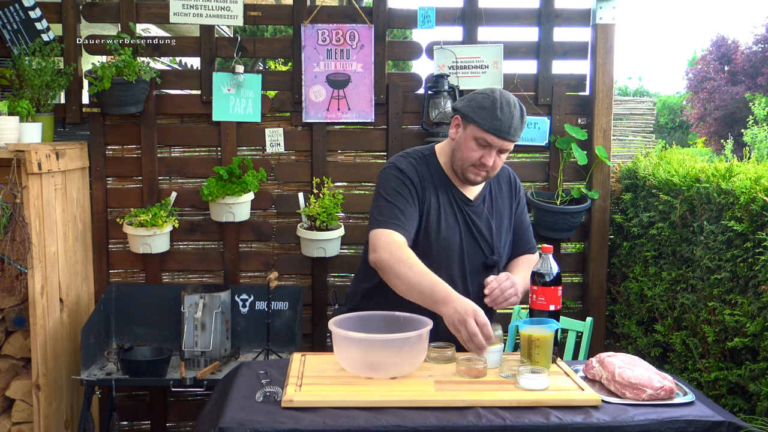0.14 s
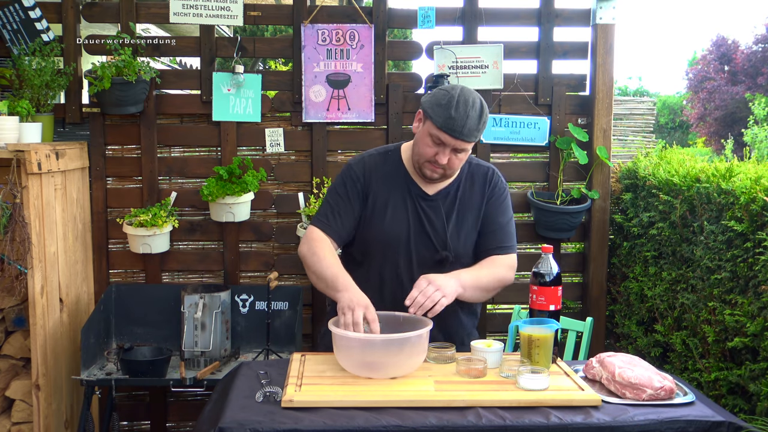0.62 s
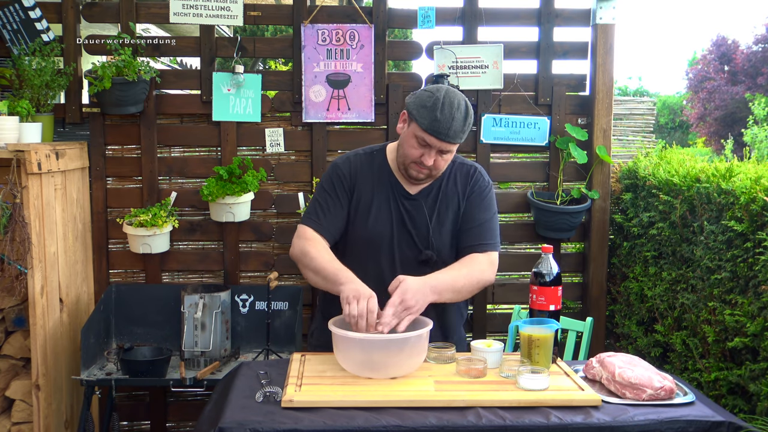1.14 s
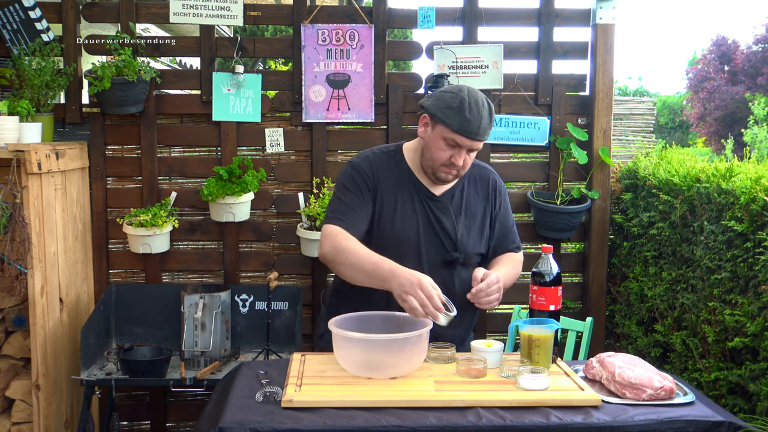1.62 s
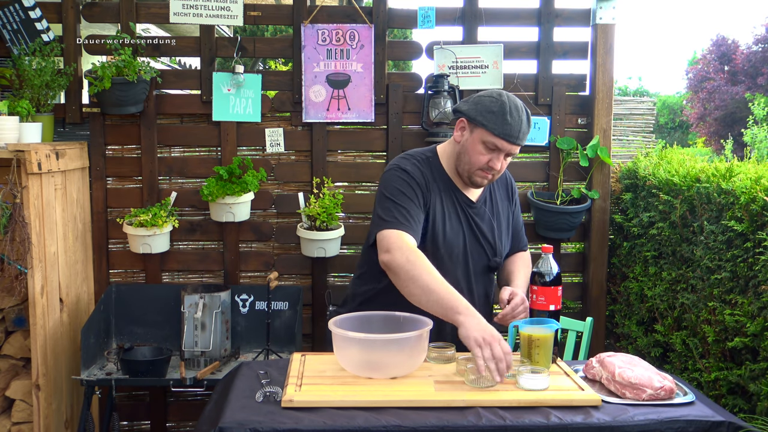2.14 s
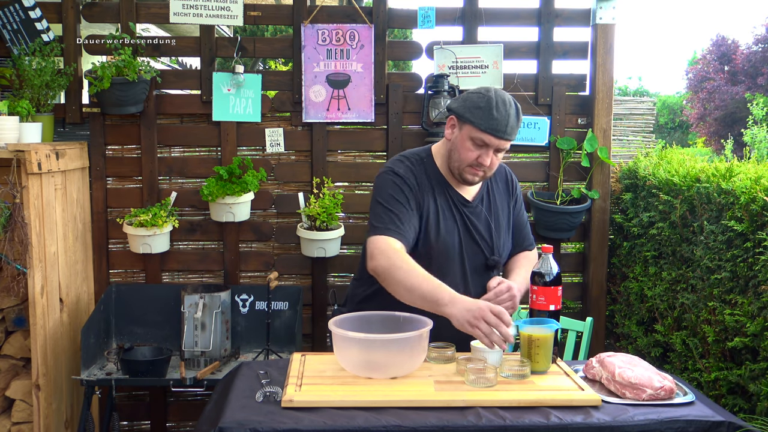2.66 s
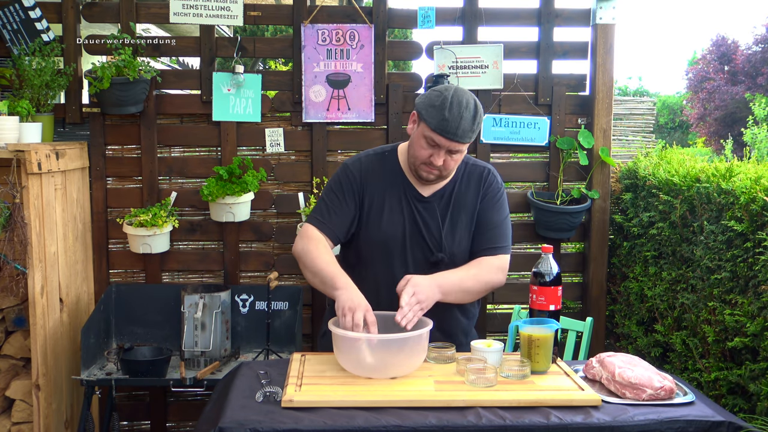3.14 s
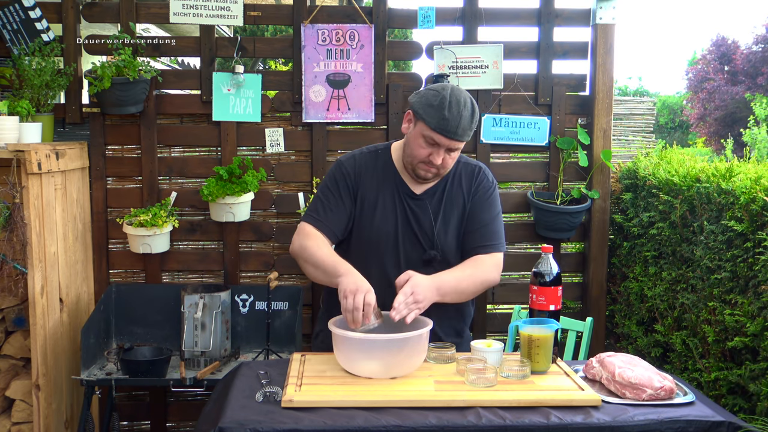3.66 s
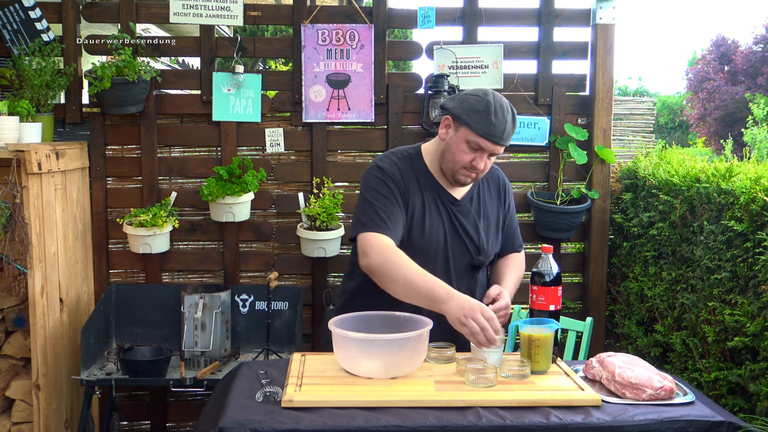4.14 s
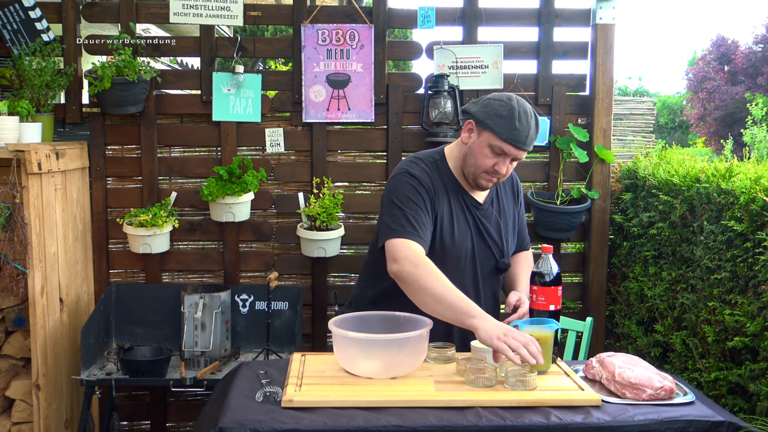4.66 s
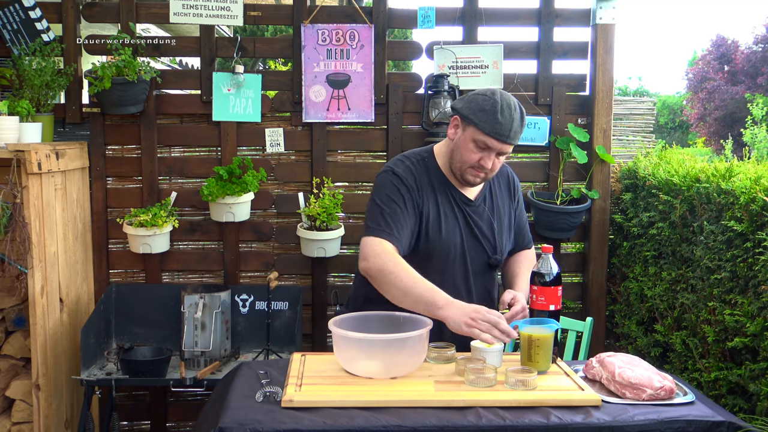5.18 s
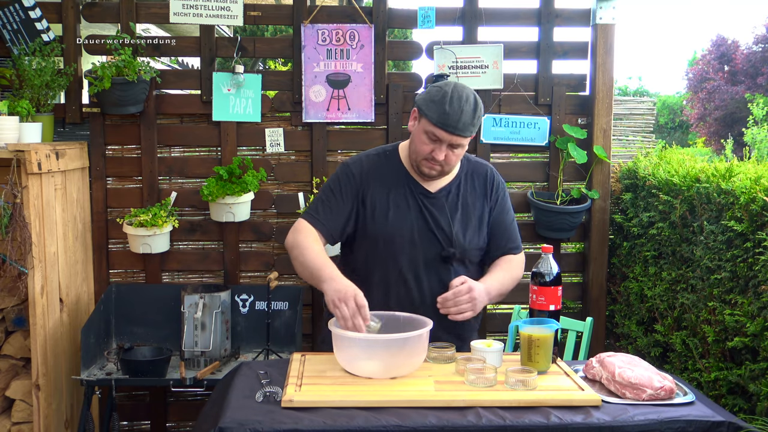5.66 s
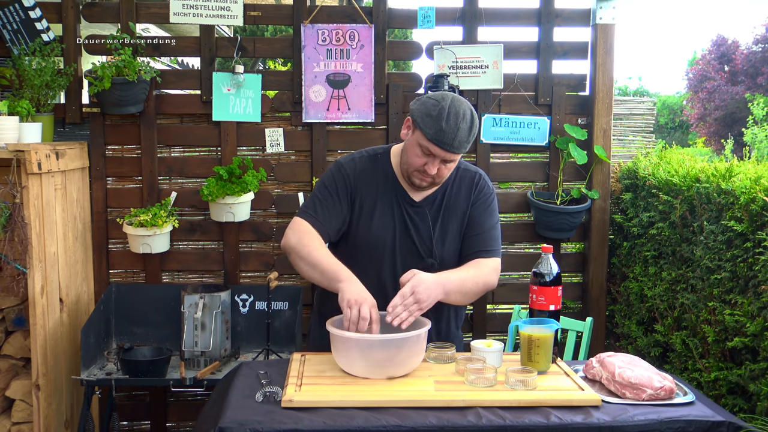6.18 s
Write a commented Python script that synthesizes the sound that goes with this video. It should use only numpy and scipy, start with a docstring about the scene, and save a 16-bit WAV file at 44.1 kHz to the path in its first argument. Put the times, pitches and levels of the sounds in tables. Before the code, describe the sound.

In a garden, low distant traffic and thin bird chirps run throughout. Close by, fingers slap a small glass dish over a plastic bowl, with short muted glassy pings. It is put down on a wooden board in a quick rattle of knocks. A second dish is tapped out, then set down much harder with a loud ringing clink that slightly overloads the microphone. Two dull bowl bumps end the stretch.

```python
"""Traffic rumble and birds throughout; over them, small glass dishes are tapped over a plastic bowl
and set on a wooden board in turn at a garden table. Traffic is shaped noise, birds are gliding
whistles; glass, bowl and board are sums of dying modes. Fingers damp the glass, slaps are noise
bursts, sliding powder is dense grains. The loudest blow overloads the microphone."""
import sys
import numpy as np
from scipy import signal
from scipy.fft import rfft, irfft
from scipy.io import wavfile
from scipy.ndimage import uniform_filter1d

SR = 44100
rng = np.random.default_rng(int(sys.argv[2]) if len(sys.argv) > 2 else 0)


def unload_wav(signal):
    """Save mono or channel-first audio to the path in sys.argv[1] as 16-bit WAV at rate SR, clipped to [-1, 1]."""
    wavfile.write(
        sys.argv[1],
        SR,
        np.round(np.clip(np.atleast_2d(signal).T, -1, 1) * 32767).astype(np.int16),
    )


def amplitude_ratio(level_db):
    """Convert a level in decibels to the matching linear amplitude (field) ratio."""
    exponent = np.asarray(level_db, float) / 20
    return 10 ** exponent


N = 277389

# traffic spectrum: (frequency [Hz], density [dB per Hz])
TRAFFIC_SPECTRUM = [(12, -41.5), (20, -9.5), (38, 5), (65, 0.5), (146, -9), (277, -3.5), (499, -8.5),
                    (660, -4.5), (1150, -12.5), (1760, -17), (2260, -19), (4810, -30), (6720, -35.5),
                    (14700, -38), (16000, -46)]
# traffic swell: (time [s], roar level [dB], rumble level before its random waver [dB])
TRAFFIC_LEVELS = [(0, -51, -48), (1.9, -49.5, -52.5), (4.0, -51, -47.5), (4.8, -49.5, -48),
                  (5.2, -50, -56.5), (6.29, -50.5, -53)]
DRONE_HZ, DRONE_WIDTH_HZ, DRONE_DB = 52.5, 9.1, -7.5   # a far engine, dB over the rumble
RUMBLE_SWELL_DB, RUMBLE_SWELL_S = 2.5, .3   # random waver: std of its points, their spacing

# one bird's repeated chirp: (time [s], level [dB])
CHIRP_TIMES = [(.03, -60), (.428, -57), (.775, -57.5), (1.114, -57), (1.441, -55), (1.55, -62),
               (2.19, -65.5), (2.3, -71), (2.57, -61.5), (2.9, -59.5), (4.0, -60), (4.14, -57.5)]
# parts of the chirp: (delay [s], length [s], start [Hz], end [Hz], level over the chirp [dB])
CHIRP_PARTS = [(0, .025, 3180, 4450, 0), (0.023, 0.049, 4600, 4720, 0.5), (.07, 0.027, 3800, 3250, 0)]
# single notes of other birds: (time [s], mid pitch [Hz], level [dB])
BIRD_NOTES = [(.045, 2930, -54.5), (.536, 4640, -56), (.619, 4780, -56), (.98, 4530, -57),
              (1.258, 5100, -58), (1.799, 5000, -55.5), (1.908, 4650, -57), (2.429, 2870, -53.5),
              (2.452, 5080, -59.5), (3.02, 4980, -58), (3.338, 2960, -55), (3.642, 5050, -54),
              (3.75, 4720, -59), (4.19, 5410, -56.5), (4.667, 5480, -67), (4.936, 4880, -61),
              (5.171, 4860, -56), (5.28, 4730, -56.5), (5.444, 3830, -57.5), (5.485, 2970, -54.5),
              (5.696, 4800, -54), (5.717, 5530, -54)]
# bouts of farther birds: (start [s], end [s], level [dB])
CHORUS_BOUTS = [(.0, .15, -70), (.55, 1.487, -64), (1.763, 1.95, -63.5), (2.399, 2.74, -69.5),
                (3.045, 3.22, -60), (3.6, 4.291, -67.5), (4.596, 4.997, -64.5), (5.15, 5.554, -69.5),
                (5.699, 5.874, -62.5), (6.152, 6.29, -60.5)]
# range of chorus start pitches: (lowest [Hz], highest [Hz])
CHORUS_RANGE_HZ = (3035, 5424)
NOTE_S, NOTE_RISE_SHARE = .038, .08   # notes slide up a little
BOUT_FADE_DB_PER_S, CHORUS_QUIET_DB = 127.5, -88.5
WARBLE_HZ = 85   # rms pitch wander
GARDEN_DB, GARDEN_CHORUS_DB, GARDEN_T60_S, GARDEN_CUT_HZ = -4, 4, .25, 9000   # echo energy over direct

# glass contacts: (time [s], low ring [dB], first dish's high ring [dB], second dish's high ring [dB],
#                  freedom from the fingers [0-1])
GLASS_CLINKS = [(.6085, -59, -47, -47, 0.06), (0.6662, -80, -37, -53, 0.36), (1.1159, -62, -42, -49, 0.3),
                (1.259, -59.5, -41, -47.5, 0), (2.0522, -32, -33.5, -56, 0.19),
                (2.098, -29, -47, -50.5, 0.08), (2.127, -33, -52, -53, 0.3), (3.5677, -44, -42, -20, .1),
                (3.6476, -76, -65, -51, 0.3), (4.3105, -5, -0.5, -16, 0.17), (4.3291, -21, -3, -20, 0.46),
                (4.345, -13.5, -35.5, -14, 1), (4.796, -46, -43, -59, 0.32)]
# finger on the held dish over the bowl: (time [s], slap [dB], bowl [dB], low ring [dB], high ring [dB])
FINGER_TAPS = [(0.885, -50, -60, -62, -40), (0.9062, -27, -24.5, -38, -26), (0.914, -28, -41, -64, -54),
               (0.967, -36, -53, -57, -43), (1.055, -10, -25, -49, -42), (1.1983, -11, -35, -32, -10),
               (3.267, -38, -52, -70, -60), (3.2817, -29, -26.5, -44, -28), (3.4345, -9, -28.5, -22.5, -13),
               (3.5687, -9.5, -38, -47, -20), (5.9956, -33, -58, -68, -60), (6.0204, -30, -52, -67, -62),
               (6.235, -34, -66.5, -70, -60)]
# the hand lets go of a dish that still rocks: (time [s], low ring [dB])
RELEASES = [(2.147, -49), (4.35, -13.5)]
# low glass ring: (frequency [Hz], t60 when free [s])
LOW_RING_MODE = (2702, .38)
# high modes of each dish: (frequency [Hz], level [dB], t60 when free [s])
FIRST_DISH_MODES = [(3050, -26, .05), (4549, -30, .06), (6358, -14, .26), (11230, -27, .13),
                    (11820, -26, .15)]
SECOND_DISH_MODES = [(6993, -10, .17), (7095, -8, .18), (12170, -32, .12), (14910, -30, .078)]
# spectrum of glass grinding on glass: (frequency [Hz], density [dB per Hz])
GRIND_SPECTRUM = [(2000, -34), (3500, -4), (4800, 5), (8000, -16.5), (12000, -17), (16000, -28)]
HELD_FREEDOM, HELD_SECOND_DB = 0.14, -13   # the gripped dish rings briefly
SWELL_S, ROCKING_S = .004, 0.055   # the freed ring builds up, is fed while the dish rocks, then dies
GRIND_DB, GRIND_T60_S = -32.5, 0.24   # dB over the first dish's ring
MIN_FREEDOM = .03
SPOT_DB = 2.42   # spread of mode strengths from blow to blow

# powder and fingers sliding: (peak time [s], peak level [dB], rise [dB per s], fall [dB per s])
SLIDE_SWELLS = [(.68, -68, 90, 110), (1.2, -62.5, 27, 35), (1.9, -59, 85, 133), (3.199, -59.5, 60, 25),
                (3.27, -47.5, 320, 260), (5.85, -55.5, 150, 250), (6.054, -44.5, 313, 53)]
# sliding spectrum: (frequency [Hz], density [dB per Hz])
SLIDE_SPECTRUM = [(590, -43.5), (1000, -3), (1260, -19), (1480, 5), (3710, -5.5), (7440, -4), (10400, -8.5),
                  (13000, -11.5), (16000, -17)]
GRAINS_PER_S, GRAIN_SPREAD_DB, CLUMP_DB = 7000, 0.5, 2.6   # clumps last a few ms

# slap spectrum, skin on glass: (frequency [Hz], density [dB per Hz])
SLAP_SPECTRUM = [(180, -16.5), (300, 10), (667, -9.5), (1510, 2.5), (2320, -1), (2610, -1), (4520, -13.5),
                 (6100, 4.5), (8220, -9), (16000, -17)]
# jolt of hand and table: (frequency [Hz], level over the slap [dB], t60 before freedom [s])
JOLT_MODES = [(63.7, -24, 0.13), (118, -16.5, 0.047), (343, -16, 0.008)]
# plastic bowl modes: (frequency [Hz], level [dB], t60 before freedom [s])
BOWL_MODES = [(87, -17.5, 0.085), (143, -10, 0.051), (192, -4.5, 0.044), (274, -19.5, 0.13),
              (419, 4.5, 0.016), (462, -5.5, 0.026), (528, -25, 0.13), (1010, -9.5, 0.05), (1480, 2, 0.025),
              (2050, 8, 0.014)]
# dish bumps the bowl wall: (time [s], level [dB], roll-off [Hz])
BOWL_BUMPS = [(5.8643, -9, 900), (5.879, -7, 453)]
SLAP_T60_S = .008   # all slaps are equally short
BOWL_ROLL_HZ, BOWL_ROLL_HZ_PER_DB, BOWL_ROLL_MIN_HZ = 900, 17, 400   # first is for a -10 dB slap
BUMP_SLAP_DB, BUMP_SLAP_T60_S = -31, 0.0084   # dB over the bump

# dish foot on the board: (time [s], level [dB], hardness as roll-off [Hz], hollow level [dB])
BOARD_KNOCKS = [(2.0568, -5, 1300, -24), (2.094, -19, 1170, -43), (2.0987, -5.5, 1400, -35),
                (2.127, -7.5, 1600, -17.5), (2.1468, -3.5, 1400, -43), (2.159, -12.5, 1500, -44),
                (2.168, -21, 1400, -52), (2.175, -32, 1500, -55), (4.3107, -2, 3300, -18.5),
                (4.3296, -9, 2500, -32.5), (4.339, -8.5, 1800, -37.5), (4.352, -15, 2400, -41),
                (4.36, -7, 2100, -51.5), (4.371, -15, 1800, -49), (4.531, -3, 1400, -46),
                (4.541, -4, 1900, -38), (4.554, -18.5, 1200, -25.5), (4.984, -11, 1160, -33)]
# wooden board modes: (frequency [Hz], level [dB], t60 before BOARD_FREEDOM [s])
BOARD_MODES = [(138, -20, 0.36), (239, -24.5, 0.36), (499, -14, 0.14), (611, -28, 0.23), (757, -13.5, 0.13),
               (780, -12.5, 0.09), (824.4, -7, 0.075), (930.3, -4, 0.076), (900, -12, 0.034),
               (1197, -19.5, 0.014), (1258, -2.5, 0.039), (1400, -15, 0.13), (1488, -11, 0.07),
               (1760, -25.5, 0.07), (1687, -11.5, 0.058), (1982, 0, 0.029), (2140, -23.5, 0.094)]
# contact click spectrum: (frequency [Hz], density [dB per Hz])
CLICK_SPECTRUM = [(300, -45), (1200, 8), (3000, 16.5), (6000, -8.5), (16000, -25.0)]
BOARD_FREEDOM = 0.7   # the dish resting on the wood shortens its ring
HOLLOW_HZ, HOLLOW_T60_S, HOLLOW_RISE_S = 312, .33, .035   # air space under the board, slow to start
USUAL_HARDNESS_HZ = 1400
CLICK_DB, CLICK_DB_PER_OCTAVE, CLICK_T60_S = -32.5, 26, 0.02   # harder contacts click more
FENCE_DB, FENCE_T60_S, FENCE_CUT_HZ = -21, 0.24, 2900   # near reflections


def at_hz(points, hz):
    """Read a spectrum on a log-frequency axis."""
    point_hz, point_db = np.array(points).T
    return np.interp(np.log(np.maximum(hz, 1)), np.log(point_hz), point_db)


def in_time(rows, column):
    """One column of a curve at every sample."""
    rows = np.array(rows)
    return np.interp(np.arange(N) / SR, rows[:, 0], rows[:, column])


def coloured(x, spectrum):
    """Shape by a spectrum; rms 1."""
    gain = amplitude_ratio(at_hz(spectrum, np.fft.rfftfreq(len(x), 1 / SR)))
    y = irfft(rfft(x) * gain, len(x))
    return y / np.sqrt(np.mean(y ** 2))


def dying(t, t60):
    """Envelope that loses 60 dB in t60."""
    return np.exp(-np.log(1000) * t / t60)


def add(out, s, sound):
    """Mix a sound in at time s."""
    i = max(round(s * SR), 0)
    out[i:i + len(sound)] += sound[:N - i]


def tail(x, db, t60, cut_hz):
    """Add scattered echoes: dulled noise that dies away."""
    t = np.arange(int(t60 * SR)) / SR
    dull = signal.butter(1, cut_hz, fs=SR, output="sos")
    echo = signal.sosfilt(dull, rng.standard_normal(len(t)))
    echo = echo * dying(t, t60) * (t > .006)   # no echo in the first 6 ms
    echo = echo / np.sqrt(np.sum(echo ** 2))
    return x + amplitude_ratio(db) * signal.fftconvolve(x, echo)[:N]


def struck(modes, db, freedom=0.89, roll_hz=30000.):
    """All modes start together over the contact time; a soft blow dulls them."""
    hz, mode_db, t60 = np.transpose(modes)[:, :, None]
    t60 = t60 * np.clip(freedom, MIN_FREEDOM, 1)
    t = np.arange(int(t60.max() * SR)) / SR
    spot = amplitude_ratio(SPOT_DB * rng.standard_normal(hz.shape))   # no two blows land on the same spot
    gain = amplitude_ratio(db + mode_db) * spot / (1 + (hz / roll_hz) ** 6) ** .5
    contact = np.sin(np.pi / 2 * np.minimum(t * roll_hz / 2.95, 1)) ** 2
    return contact * np.sum(gain * dying(t, t60) * np.sin(2 * np.pi * hz * t), axis=0)


def burst(db, t60, spectrum):
    """A short puff of noise of even strength; db is roughly its first peak."""
    t = np.arange(SR // 8) / SR
    shape = dying(t, t60) * (1 - np.exp(-t / 0.00016))
    puff = coloured(rng.standard_normal(len(t)), spectrum) * shape
    return amplitude_ratio(db - 5.0) * puff * np.sqrt(np.sum(shape ** 2) / np.sum(puff ** 2))


def traffic():
    """Far roar and a low rumble with an engine drone: noise bands that swell apart."""
    noise = coloured(rng.standard_normal(N), TRAFFIC_SPECTRUM)
    rumble = signal.sosfiltfilt(signal.butter(2, 100, fs=SR, output="sos"), noise)
    roar = noise - rumble
    resonance = signal.iirpeak(DRONE_HZ, DRONE_HZ / DRONE_WIDTH_HZ, SR)
    drone = signal.lfilter(*resonance, rng.standard_normal(N))
    low = rumble / rumble.std() + amplitude_ratio(DRONE_DB) * drone / drone.std()
    waver = np.interp(np.arange(N) / SR / RUMBLE_SWELL_S, np.arange(100), rng.standard_normal(100))
    roar_gain = amplitude_ratio(in_time(TRAFFIC_LEVELS, 1))
    low_gain = amplitude_ratio(in_time(TRAFFIC_LEVELS, 2) + RUMBLE_SWELL_DB * waver)
    return roar_gain * roar / roar.std() + low_gain * low


def whistles(notes):
    """Gliding whistles with an unsteady pitch."""
    out = np.zeros(N)
    unsteady = uniform_filter1d(rng.standard_normal(N + SR), size=150) * np.sqrt(150)   # rms 1
    for s, length, start_hz, end_hz, db in notes:
        part = np.linspace(0, 1, max(int(length * SR), 50))
        i = max(int(s * SR), 0)
        hz = start_hz + (end_hz - start_hz) * part + WARBLE_HZ * unsteady[i:i + len(part)]
        add(out, s, amplitude_ratio(db) * np.sin(np.pi * part) ** 0.43 * np.sin(2 * np.pi * np.cumsum(hz) / SR))
    return out


def chorus():
    """Farther birds: random short whistles, blurred by echoes and heard in bouts."""
    when, pitch, glide, size = rng.random(size=(600, 4)).T
    lowest_hz, highest_hz = CHORUS_RANGE_HZ
    start_hz = lowest_hz + (highest_hz - lowest_hz) * pitch
    end_hz = start_hz * (0.7 + .6 * glide)
    far = whistles(zip(when * N / SR, 0.0089 + 0.024 * size, start_hz, end_hz, 8 * size))
    far = tail(far, GARDEN_CHORUS_DB, GARDEN_T60_S, GARDEN_CUT_HZ)
    t = np.arange(N) / SR
    bouts = amplitude_ratio(CHORUS_QUIET_DB)
    for start, end, db in CHORUS_BOUTS:
        outside_s = np.maximum(np.maximum(start - t, t - end), 0)
        bouts = bouts + amplitude_ratio(db - BOUT_FADE_DB_PER_S * outside_s)
    return bouts * far / far.std()


def birds():
    """Nearer chirps and notes as whistles with garden echoes, over the chorus."""
    near = [(s + delay, length, start_hz, end_hz, db + part_db)
            for s, db in CHIRP_TIMES
            for delay, length, start_hz, end_hz, part_db in CHIRP_PARTS]
    near += [(s, NOTE_S, hz * (1 - NOTE_RISE_SHARE / 2), hz * (1 + NOTE_RISE_SHARE / 2), db)
             for s, hz, db in BIRD_NOTES]
    return tail(whistles(near), GARDEN_DB, GARDEN_T60_S, GARDEN_CUT_HZ) + chorus()


def glass():
    """Each touch damps the low ring and sets it to a new strength; the high rings pile up."""
    out, t = np.zeros(N), np.arange(SR // 2) / SR
    hz, t60 = LOW_RING_MODE
    tapped = [(s, low_db, high_db, high_db + HELD_SECOND_DB, HELD_FREEDOM)
              for s, _, _, low_db, high_db in FINGER_TAPS]
    touches = [row[0] for row in GLASS_CLINKS + tapped + RELEASES]

    def low_ring(s, db, envelope):
        """One stretch of the low mode, crossfaded into the next touch over 1.5 ms."""
        next_s = min([u for u in touches if u > s] + [9])
        fade_in = np.clip(t / .0015, 0, 1)
        fade_out = np.clip((next_s - s - t) / .0015 + 1, 0, 1) * np.clip(10 - 20 * t, 0, 1)
        tone = np.sin(2 * np.pi * hz * (t + s))   # phase runs on from touch to touch
        add(out, s, amplitude_ratio(db) * fade_in * fade_out * envelope * tone)

    for s, low_db, first_db, second_db, freedom in GLASS_CLINKS + tapped:
        low_ring(s, low_db, dying(t, t60 * np.clip(freedom, MIN_FREEDOM, 1)))
        add(out, s, struck(FIRST_DISH_MODES, first_db, freedom))
        add(out, s, struck(SECOND_DISH_MODES, second_db, freedom))
    for s, _, first_db, _, _ in GLASS_CLINKS:
        add(out, s, burst(first_db + GRIND_DB, GRIND_T60_S, GRIND_SPECTRUM))
    for s, db in RELEASES:
        build_up = 1 - .3 * np.exp(-t / SWELL_S)
        low_ring(s, db, build_up * dying(np.maximum(t - ROCKING_S, 0), t60))
    return out


def sliding():
    """Dense tiny grains in clumps under the movement of powder and fingers."""
    sizes = amplitude_ratio(GRAIN_SPREAD_DB * np.minimum(rng.exponential(1, N), 4)) * rng.choice([-1, 1], N)
    clumps = uniform_filter1d(uniform_filter1d(rng.standard_normal(N), size=200), size=200)
    present = rng.random(N) < GRAINS_PER_S / SR
    grains = coloured(sizes * present * amplitude_ratio(CLUMP_DB * clumps / clumps.std()), SLIDE_SPECTRUM)
    t = np.arange(N) / SR
    movement = sum(amplitude_ratio(db - np.maximum(rise * (s - t), fall * (t - s)))
                   for s, db, rise, fall in SLIDE_SWELLS)
    return grains * movement


def taps_and_bumps():
    """A bright slap of skin on glass, a low jolt and a bowl thud; wall bumps are mostly thud."""
    out = np.zeros(N)
    blows = []
    for s, slap_db, bowl_db, _, _ in FINGER_TAPS:   # quieter taps have duller thuds
        roll_hz = max(BOWL_ROLL_HZ + BOWL_ROLL_HZ_PER_DB * (slap_db + 10), BOWL_ROLL_MIN_HZ)
        blows.append((s, slap_db, bowl_db, roll_hz, SLAP_T60_S))
    for s, db, roll_hz in BOWL_BUMPS:
        blows.append((s, db + BUMP_SLAP_DB, db, roll_hz, BUMP_SLAP_T60_S))
    for s, slap_db, bowl_db, roll_hz, t60 in blows:
        add(out, s, burst(slap_db, t60, SLAP_SPECTRUM))
        add(out, s, struck(JOLT_MODES, slap_db, roll_hz=2500))
        add(out, s, struck(BOWL_MODES, bowl_db, roll_hz=roll_hz))
    return out


def board():
    """Wood modes, a contact click and the hollow beneath."""
    out, t = np.zeros(N), np.arange(SR // 2) / SR
    no_bass = signal.butter(2, 400, "high", fs=SR, output="sos")   # a small board radiates no bass
    swell = (1 - np.exp(-t / HOLLOW_RISE_S)) * dying(t, HOLLOW_T60_S)
    for s, db, roll_hz, hollow_db in BOARD_KNOCKS:
        wood = struck(BOARD_MODES, db, BOARD_FREEDOM, roll_hz=roll_hz)
        add(out, s, signal.sosfilt(no_bass, wood))
        harder_octaves = np.log2(roll_hz / USUAL_HARDNESS_HZ)
        click_db = db + CLICK_DB + CLICK_DB_PER_OCTAVE * harder_octaves
        add(out, s, burst(click_db, CLICK_T60_S, CLICK_SPECTRUM))
        add(out, s, amplitude_ratio(hollow_db) * swell * np.sin(2 * np.pi * HOLLOW_HZ * (t + s)))
    return out


def scene():
    """Table sounds with near echoes over the garden."""
    garden = traffic() + birds()
    table = glass() + sliding() + taps_and_bumps() + board()
    return (garden + tail(table, FENCE_DB, FENCE_T60_S, FENCE_CUT_HZ))[None]


def band_limit(x):
    """A steep low-pass at the top of the band."""
    return signal.sosfilt(signal.butter(12, 16830, fs=SR, output="sos"), x)


def record(dry):
    """The microphone clips the loudest peaks; a low-pass cuts the top."""
    top_cut = signal.cheby2(10, 50, 16300, fs=SR, output="sos")
    clipped = np.clip(dry, -1, 1)
    mix = np.clip(signal.sosfilt(top_cut, clipped), -1, 1)
    return band_limit(mix)


dry = scene()
out = record(dry)
unload_wav(out)
```